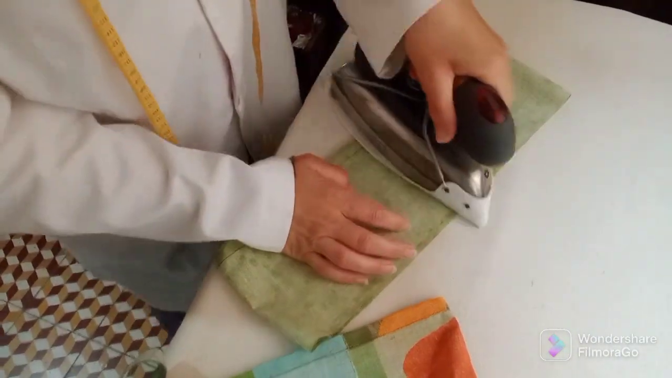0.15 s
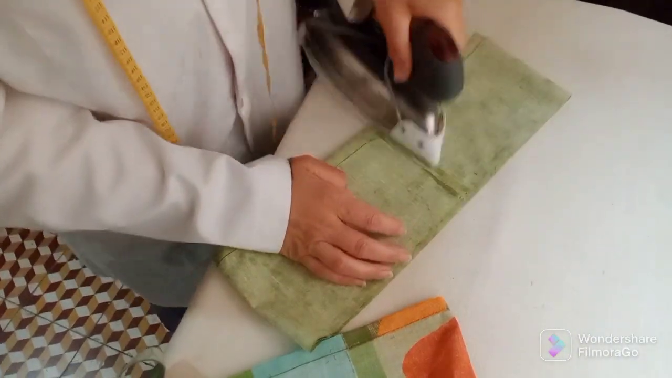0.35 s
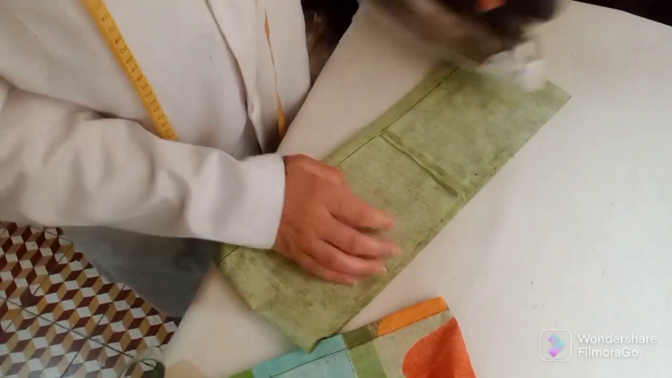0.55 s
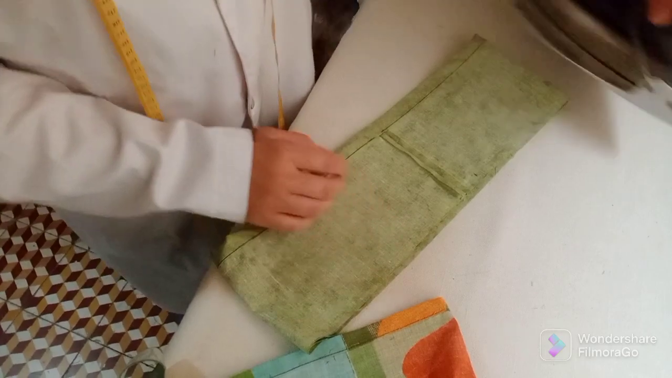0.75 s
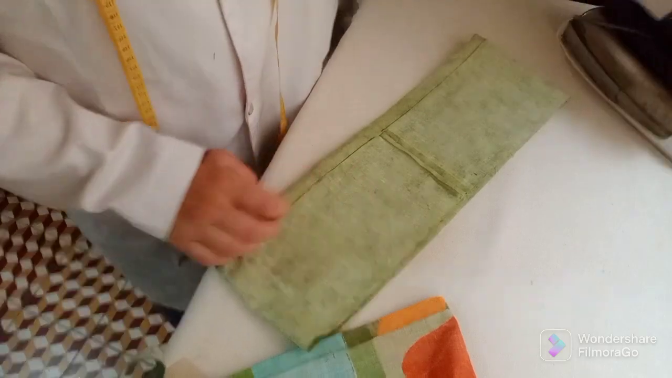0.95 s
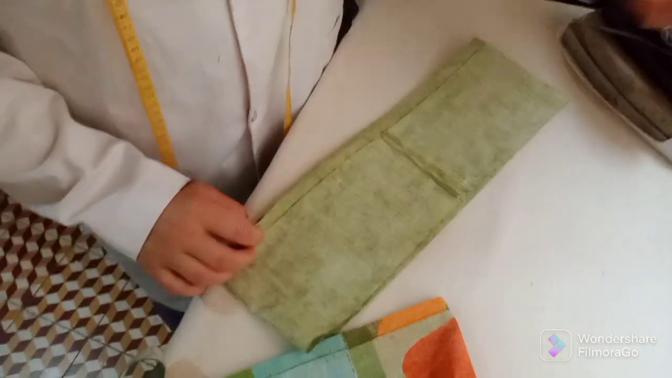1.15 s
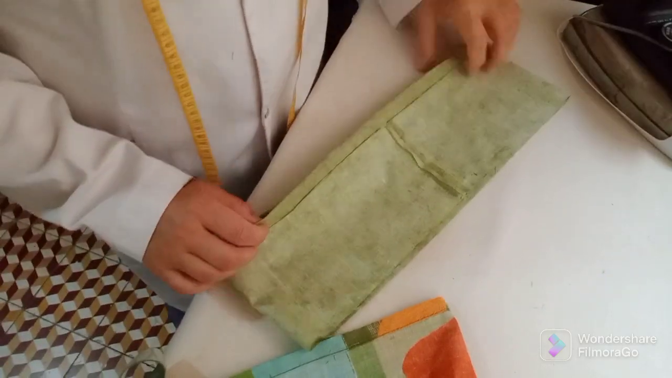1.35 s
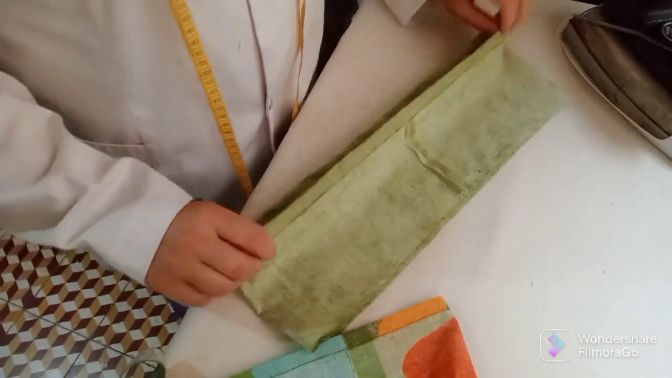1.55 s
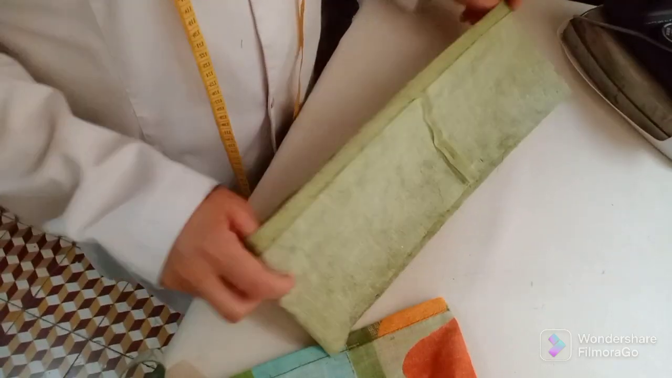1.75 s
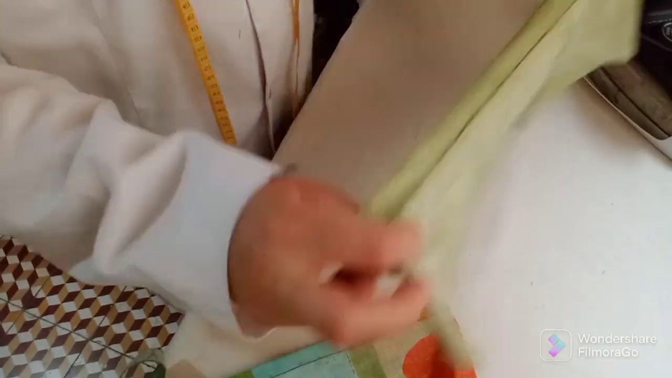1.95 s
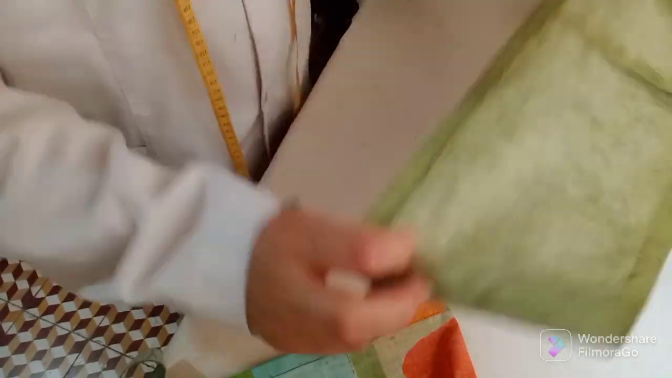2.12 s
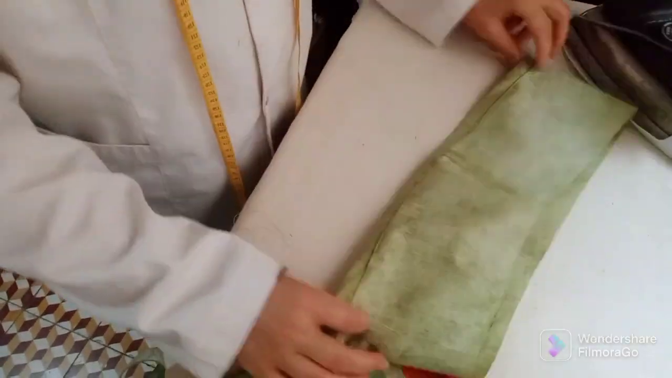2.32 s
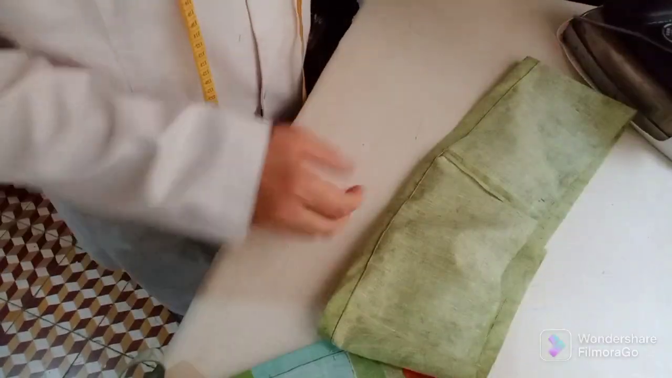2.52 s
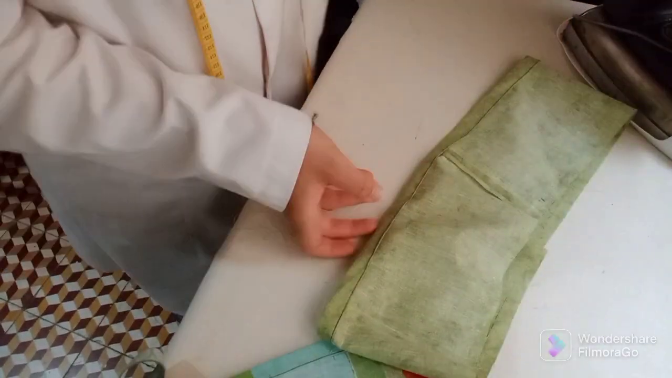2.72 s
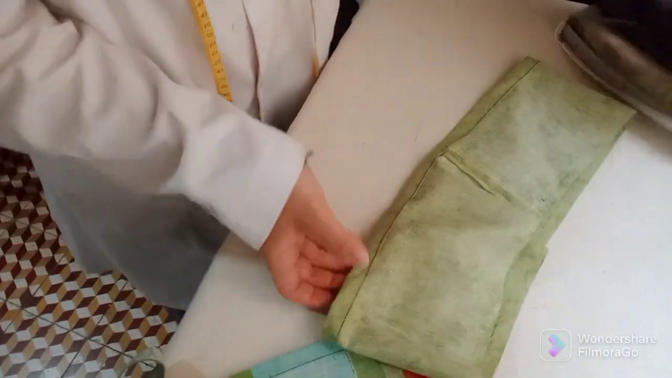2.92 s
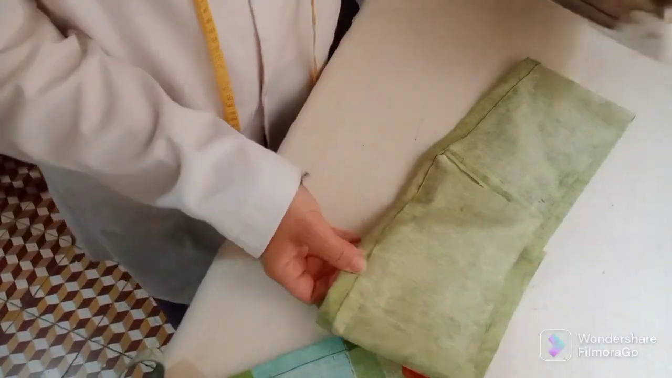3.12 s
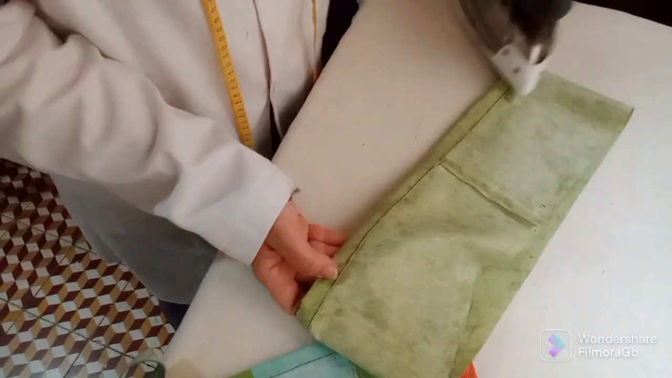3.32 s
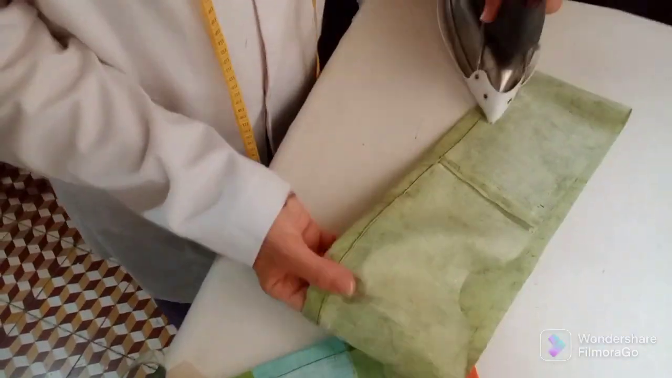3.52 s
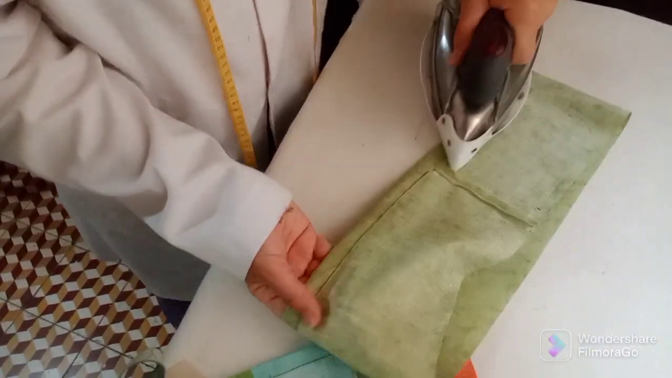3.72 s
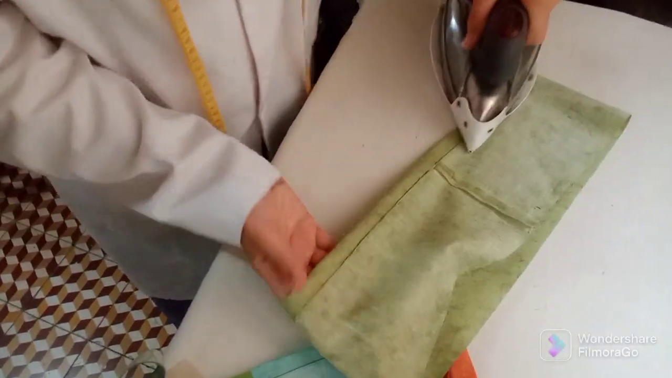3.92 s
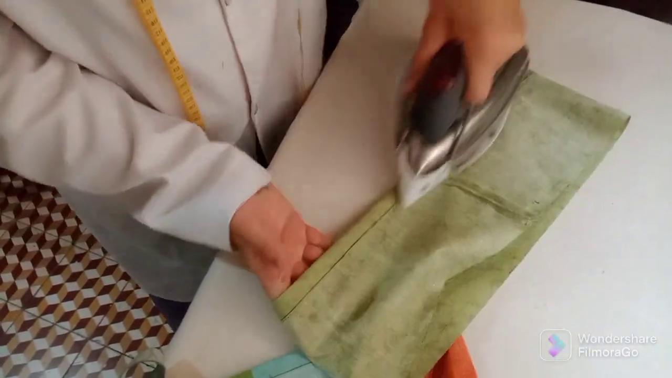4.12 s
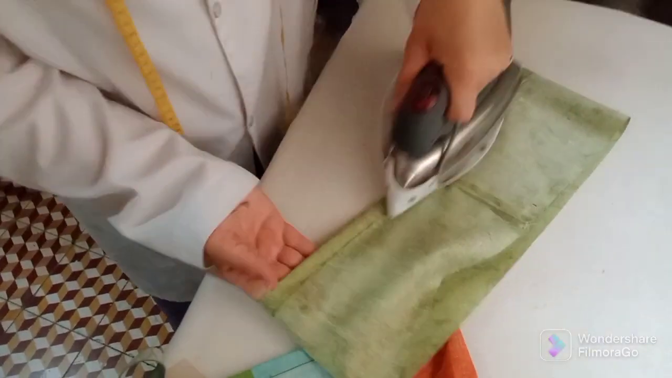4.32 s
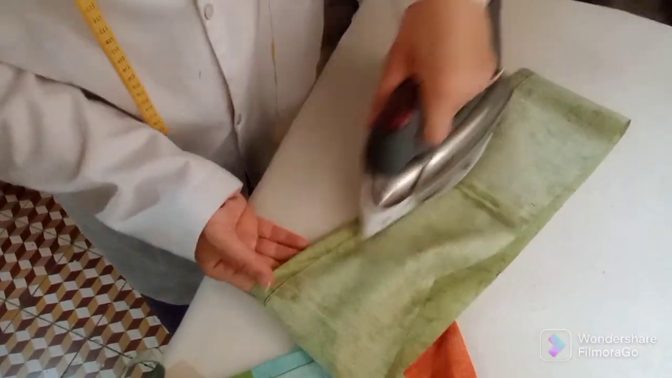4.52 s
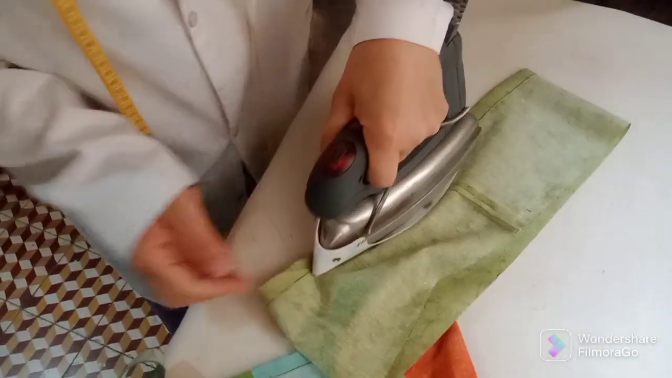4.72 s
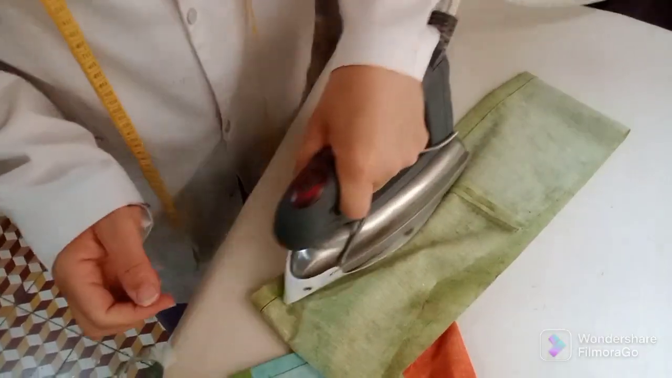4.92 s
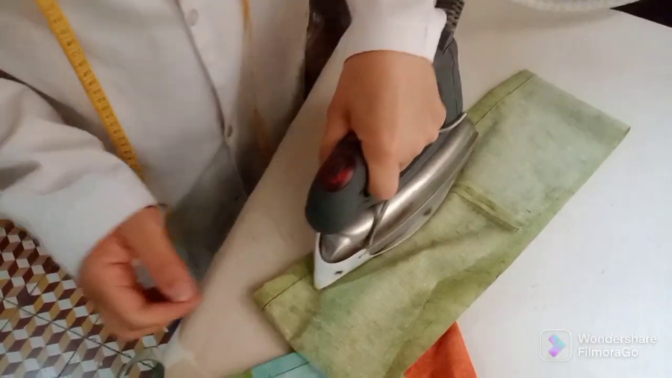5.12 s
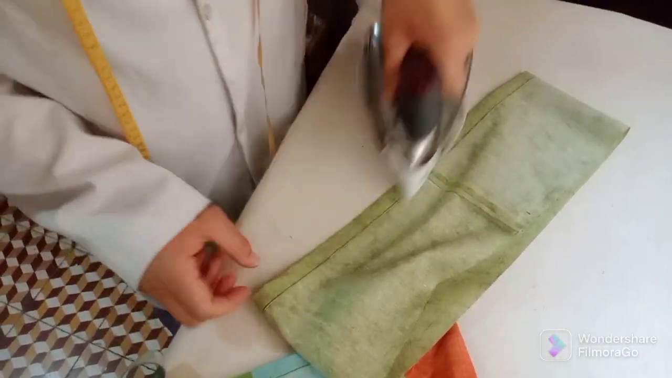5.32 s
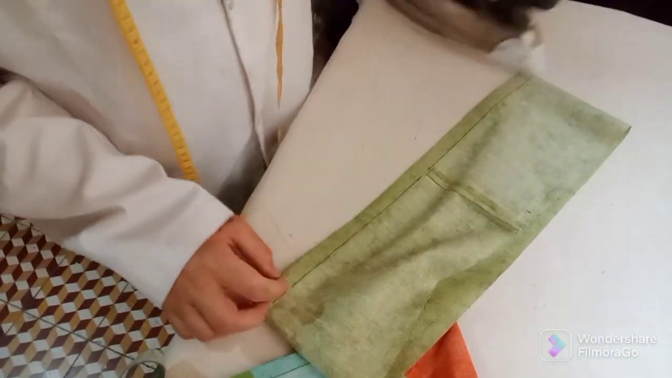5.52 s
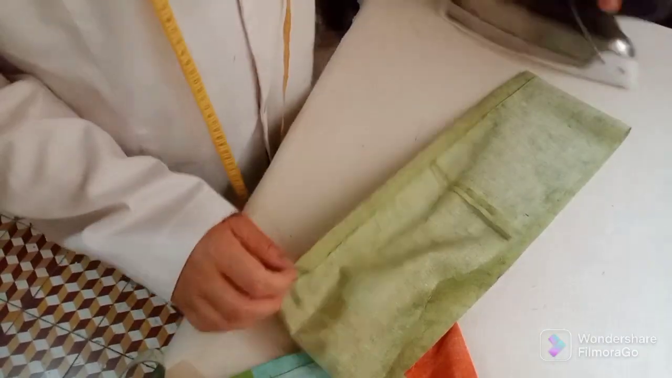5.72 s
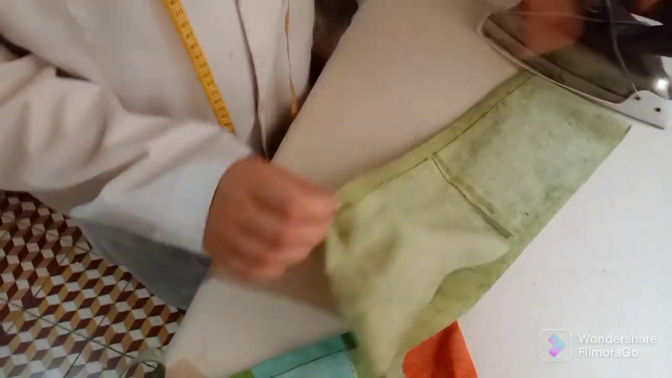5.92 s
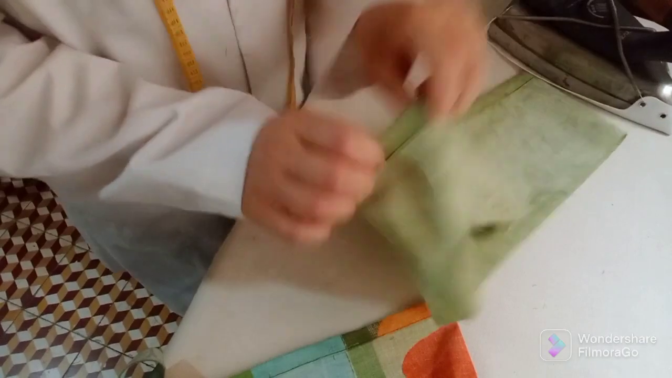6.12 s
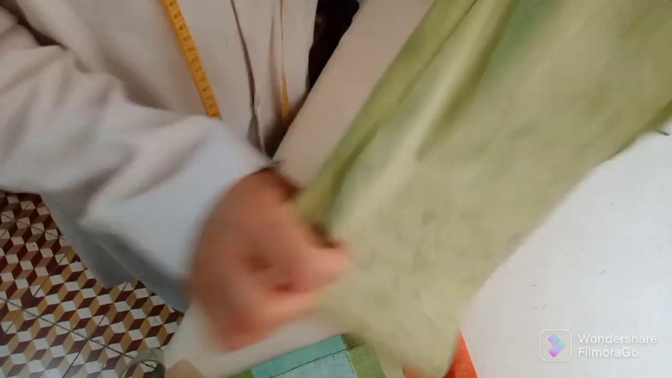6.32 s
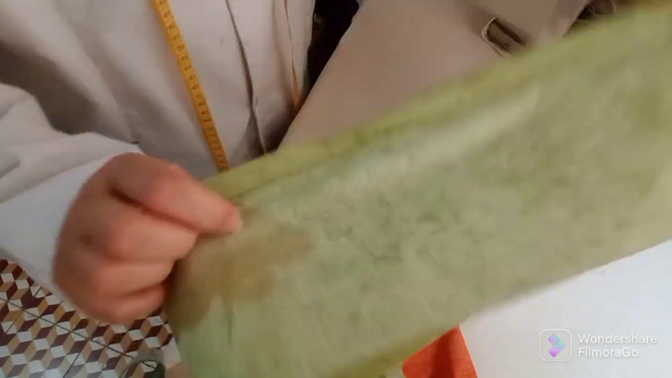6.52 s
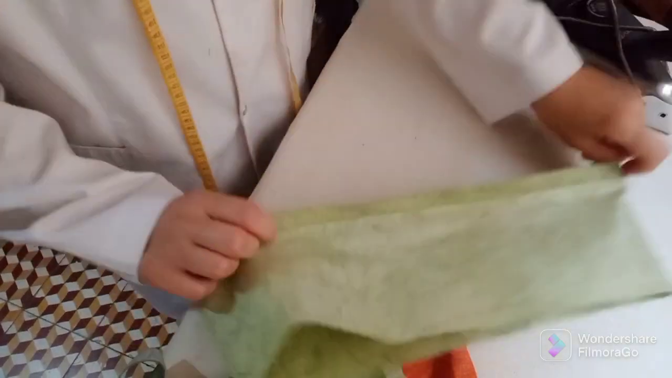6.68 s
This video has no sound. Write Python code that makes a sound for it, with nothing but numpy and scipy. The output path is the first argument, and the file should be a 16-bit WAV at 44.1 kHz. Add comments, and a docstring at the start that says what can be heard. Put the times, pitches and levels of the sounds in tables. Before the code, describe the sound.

An iron gives two long, sputtering blasts of hissing steam, knocking on a padded table, with soft cloth rustling in between.

```python
"""A sputtering blast of steam, then a second one: an iron presses seams on a padded table in a small room.
The jet rumbles into the padding, roars through the cloth, hisses from open vents and whistles under the
sole. Knocks and pushes ring the table's modes; the valve clicks ahead of the second blast. After each
blast the iron is set down and the cloth rustles as it is turned. Two close microphone ports colour it."""
import sys
import numpy as np
from scipy import signal
from scipy.fft import rfft, irfft, next_fast_len
from scipy.io import wavfile
from scipy.ndimage import map_coordinates

SR = 44100
rng = np.random.default_rng(int(sys.argv[2]) if len(sys.argv) > 2 else 0)


def transcribe(signal):
    """Save signal, clipped to [-1, 1], as a 16-bit WAV file at the path in sys.argv[1]."""
    frames = np.atleast_2d(signal).T
    limited = np.clip(frames, -1, 1)
    pcm = np.round(limited * 32767).astype(np.int16)
    wavfile.write(sys.argv[1], SR, pcm)


N = 297675

# Noise spectra, shape only (frequency [Hz], density [dB])
AMBIENCE_SPECTRUM = [(15, -45), (25, -13), (43, -16), (130, -1.5), (285, -8), (354, -10.5), (531, -14.5),
                     (887, -20.5), (1940, -25), (4490, -29), (7710, -25.5), (14800, -32), (16000, -29)]
SWISH_SPECTRUM = [(120, -16), (200, -6.5), (450, -6), (700, -5), (1200, -9.5), (1600, -8.5), (2500, -15),
                  (4000, -15.5), (7000, -21), (9000, -45)]
RUSTLE_SPECTRUM = [(2060, -42), (3500, -6), (5200, -4), (6440, -4.5), (7460, -2.5), (13800, -3.5),
                   (16000, -0.5)]
RUMBLE_SPECTRUM = [(100, -35), (170, -6.5), (232, -10.5), (353, -0.5), (384, -3.5), (477, -3), (792, -4.5),
                   (1600, -12.5), (2080, -32), (3520, -120)]
ROAR_SPECTRUM = [(350, -32.5), (600, -10.5), (676, -11), (926, -5), (1490, -4.5), (2200, -2.5), (2430, -4),
                 (3290, -3.5), (4700, -6), (8000, -18), (10400, -44.5), (17600, -120)]
HISS_SPECTRUM = [(2060, -37), (3500, -9), (5600, -1.5), (6310, -4), (7980, -1), (9040, -2.5), (11000, -6.5),
                 (14300, -36), (22000, -120)]
TOP_TREBLE_SPECTRUM = [(7000, -35), (10500, -2.5), (12000, -5.5), (16000, -5.5), (18000, -6.5)]
# Noise common to both ports (frequency [Hz], power share [0..1])
COHERENCE = [(60, 0.91), (130, 0.65), (300, 0.85), (640, 0.61), (1400, 0.17), (3100, 0.32), (6800, 0.2),
             (15000, 0.15)]
# Colour, one list per port (centre [Hz], width [Hz], gain [dB])
PORT_BANDS = [
    [(489, 190, 4), (2045, 750, 4), (3260, 300, 3), (6850, 550, 0), (8700, 700, 4), (10510, 1000, -2.5)],
    [(129, 87, 1), (1905, 250, 6.5), (4800, 900, 0.5), (6700, 1000, -0.5), (7650, 860, 4.5),
     (11200, 2400, 4.5)],
]
# Reflections off table top, sleeve and hand (delay [ms], wander [ms], gain re direct [ratio])
NEAR_ECHOES = [(.75, 0.06, 0.18), (1.899, 0.096, 0.078)]

# Cloth slid, lifted, turned (time [s], swish [dB], rustle [dB], rise [s], fall [s])
CLOTH_MOVES = [(1.456, -68, -66.5, .07, -0.2), (1.63, -65, -58.5, 0.16, 0.34), (1.79, -77, -66.5, .1, -0.8),
               (1.968, -68, -67.5, .12, 0.5), (2.274, -82, -66, 0.26, -0.2), (2.406, -60, -58.5, 0.093, .1),
               (2.69, -61.5, -68, .02, 0.7), (2.755, -66, -55, 0.13, 0.4), (2.815, -52.5, -64, 0.026, 0.17),
               (2.99, -46.5, -52.5, 0.052, 0.14), (3.17, -72, -67, .2, .2), (3.32, -62, -68, 0.15, -0.8),
               (6.1, -62, -78, 0.18, .3), (6.24, -44.5, -55, 0.11, 0.27), (6.3, -43, -46.5, 0.18, 0.05),
               (6.404, -48.5, -49.5, .2, 0.13), (6.55, -64, -65, .2, 0.2)]
# Weave dragging on itself (time [s], pitch [Hz], glide [Hz/s], level [dB], rise and fall [s])
WEAVE_DRAGS = [(1.465, 1150, 6000, -61, .04), (6.205, 2900, 0, -56, -0.02), (6.26, 3400, -2000, -51, 0),
               (6.29, 1500, 0, -45, -0.01), (6.315, 2400, 3000, -52, 0.06), (6.375, 3000, 9000, -53, 0.01),
               (6.4, 3800, 0, -63, 0.1), (6.425, 2300, -13000, -53, -0.02)]

# Leaning, pressing, setting down (time [s], boom of the top [dB], sway of the legs [dB])
PUSHES = [(.19, -49, -49), (.28, -49, -48.5), (.38, -53, -61), (1.05, -32, -35), (1.08, -21, -33),
          (1.17, -32, -42), (1.26, -37, -59.5), (1.65, -56.5, -68), (2.41, -41.5, -42), (2.48, -52.5, -53),
          (2.62, -56.5, -65.5), (2.74, -46, -53), (2.83, -56, -60), (3.01, -54, -75), (3.37, -49, -55),
          (3.44, -33.5, -40), (3.5, -40, -31.5), (3.57, -34.5, -48), (3.73, -46.5, -60), (3.88, -43.5, -57),
          (4.04, -59, -66), (4.28, -43, -57), (4.72, -44, -52), (4.92, -34.5, -70), (5.11, -40, -51.5),
          (5.24, -41, -57), (5.77, -51, -51), (5.95, -60, -56), (6.17, -52.5, -56), (6.3, -56, -55),
          (6.43, -56, -54), (6.62, -63.5, -68)]
# Lowest modes of top and legs (frequency [Hz], width [Hz], level [dB])
BOOM_MODES = [(121.3, 25, -9.5), (134.6, 10, -2.5), (170.3, 16, -9)]
SWAY_MODES = [(46.3, 32, -14), (61.6, 8.8, -6.5), (84.9, 32, 9)]
# Iron and hands on the table (time [s], level [dB], contact re body [dB], scuffle [s], tilt [dB/octave])
KNOCKS = [(0.094, -16, -11.5, 0.019, 1.5), (0.478, -18, -10, 0.044, 4), (1.029, -7, -15, 0.026, -6.5),
          (1.044, -14.5, -6, 0.015, 4), (1.061, -7.5, -5, 0.014, -2), (1.09, -20, -1.5, 0.03, -4),
          (1.159, -21, -14, 0.026, -5.5), (1.425, -39.5, -7, 0.02, -4.5), (2.317, -44.5, -12, 0.023, -1.5),
          (2.374, -28.5, -17, 0.0092, -3.5), (2.397, -33, -21, 0.02, -2.5), (2.689, -37.5, -9, 0.025, 1),
          (2.717, -44.5, -14.5, 0.022, -2), (2.975, -34, -7, 0.02, 0.5), (3.363, -30, -8, 0.048, -21),
          (3.425, -15.5, -20, 0.036, -1), (3.472, -19, -9.5, 0.033, -8), (3.518, -20, -11, 0.029, 1),
          (3.598, -23.5, -18, 0.03, 3), (4.011, -22, -33, 0.039, 6.5), (4.367, -17, -5, 0.0091, 6.5),
          (4.844, -14, -13, 0.012, 6.5), (4.877, -13.5, -21, 0.018, 3), (4.9, -10.5, -4, 0.0086, 1),
          (4.949, -24.5, -7, 0.023, -9), (5.237, -13.5, -16.5, 0.02, 17), (5.843, -25.5, -10, 0.02, 2)]
# Struck modes (frequency [Hz], level [dB], t60 [s])
TABLE_MODES = [(222, -6.5, 0.082), (267.5, -10, 0.28), (292.6, -9.5, 0.14), (326.4, -6, 0.13),
               (368.3, -6, 0.082), (407.6, -6, 0.099), (424.4, -11.5, 0.17), (476.6, -6, 0.14),
               (544, -6, 0.031), (600, -11, 0.04), (721, -4.5, 0.04), (853, -10, 0.085), (897, -9.5, .04),
               (1020, -5.5, 0.012), (1328, -6, 0.024), (1500, -15.5, 0.016)]
VALVE_MODES = [(5700, 4, .013), (7600, -2, .006), (8600, -9, .006), (9900, -8, .006), (14240, -14, .006)]
# Valve clicks; ticks of seams and nails, and the bare release click at 5.86 s as the second blast ends (time
# [s], level [dB], left minus right [dB])
VALVE_CLICKS = [(3.345, -33, -8), (3.3551, -17, -8.5)]
BRIGHT_TICKS = [(1.7908, -48, -2.0), (1.9734, -48, -2.0), (2.4026, -41.5, -5), (2.8092, -32, -6),
                (2.9437, -50, 14), (3.1687, -47, -5), (3.2553, -52, -10), (5.8568, -25, -7),
                (5.8694, -41, -11), (6.1404, -48, -13), (6.1973, -45, -4)]

# Sole nearing or leaving a surface, one list per whistle (time [s], pitch [Hz], level [dB])
WHISTLES = [
    [(.66, 4280, -48), (.72, 4530, -45), (.8, 5190, -37.5), (.88, 5670, -34), (.95, 5770, -42),
     (1.0, 5670, -51)],
    [(3.38, 5560, -50), (3.45, 5470, -46), (3.52, 5490, -44), (3.6, 5240, -55)],
    [(5.68, 5470, -40), (5.74, 5500, -45), (5.85, 5550, -67), (5.98, 5830, -69)],
]
# Resonances of the gap under the sole (multiple of pitch [ratio], level [dB])
GAP_MODES = [(1, 4.5), (1.492, -15)]
# Steam channels in the sole (frequency [Hz], width [Hz], level re roar at its usual strength [dB])
CHANNEL_MODES = [(460, 120, -17), (1750, 200, -18), (1960, 260, -15), (2230, 260, -14), (2580, 200, -18),
                 (3340, 280, -17), (3620, 200, -19), (4700, 300, -19)]
# Sole grinding into the padding (time [s], rumble [dB], rise [s], fall [s])
PRESSES = [(.43, -40, 0.058, 0.16), (1.073, -26.5, 0.092, 0.2028), (3.49, -35, 0.023, -1.87),
           (4.908, -18, 0.043, 0.14), (5.24, -31.5, 0.02, 0.22), (5.47, -32, 0.13, 0.2741)]
# Iron position (time [s], left port lag [ms])
IRON_PATH = [(0, 0.055), (.45, -0.053), (.9, .18), (1.3, 0.15), (3.35, 0.11), (3.7, 0.015), (4.4, -0.031),
             (5.1, -0.14), (5.45, -0.051), (5.7, 0.1), (6.05, 0.2)]
# Steam, one list per blast (time [s], roar through cloth [dB], vent hiss [dB], top treble [dB])
BLASTS = [
    [(0.0, -29.5, -39, -39), (0.082, -31, -40, -37), (0.146, -25, -35, -34), (0.212, -34, -43, -39.5),
     (0.382, -30, -38.5, -31.5), (0.434, -31.5, -43.5, -34.5), (0.478, -24.5, -37.5, -33.5),
     (0.564, -21, -20, -22.5), (0.64, -20, -19.5, -19), (0.692, -26, -23, -20), (0.798, -28.5, -22.5, -28),
     (1.008, -34.5, -42.5, -47.5), (1.074, -33.5, -47, -51), (1.154, -43, -63, -59), (1.42, -72, -75, -86)],
    [(3.359, -35, -15, -17), (3.372, -36, -43, -37), (3.43, -29, -36, -37), (3.5, -31, -33, -37),
     (3.62, -34, -39, -40.5), (3.76, -36, -42.5, -38.5), (3.83, -30, -37, -35.5), (4.06, -33.5, -41, -35.5),
     (4.19, -25.5, -31.5, -33), (4.39, -26, -35, -31.5), (4.6, -30, -32, -32), (4.68, -33, -33, -31.5),
     (4.75, -28.5, -39, -34.5), (4.9, -31, -33.5, -31), (4.98, -28.5, -39, -34.5),
     (5.31, -30.5, -35.5, -28.5), (5.39, -29, -38.5, -34.5), (5.47, -22, -26.5, -33.5),
     (5.51, -25.5, -29, -32.5), (5.59, -23, -21, -22.5), (5.67, -26.5, -25, -30),
     (5.84, -41.5, -50.5, -53.5), (5.86, -37.5, -42, -44), (5.9, -45.5, -55.5, -62.5),
     (6.1, -61.5, -66, -78)],
]

AMBIENCE_DB, USUAL_ROAR_DB, RUMBLE_DB = -62, -30, -36.5
ROOM_T60_S, WALL_CUT_HZ, ROOM_DB, CUTOFF_HZ = 0.57, 3600, -21.5, 15840
PUSH_RISE_S, BOOM_FALL_S, SWAY_LEAD_S, SWAY_FALL_S = 0.047, .17, .025, 0.098
BOOM_TREMOR_DB, SWAY_TREMOR_DB, TREMOR_SWING_DB = -55.5, -62, 2.5
RUMBLE_EXPONENT, CHANNEL_EXPONENT, TREMOR_EXPONENT = 0.8, .3, .5   # on roar / usual roar
CHANNEL_WAVER_DB, PAN_DB, PAN_DB_PER_MS = 1.6, -0.73, -6
RUSTLE_STRETCH = 1.16   # rise and fall re swish


def from_db(db):
    """Decibels to gain."""
    return 10 ** (np.asarray(db) / 20)


def pan(db):
    """Stereo gains for a left-minus-right level."""
    return from_db(np.array([[.5], [-.5]]) * db)


def in_time(rows):
    """Table columns, interpolated per sample."""
    times_s, *columns = np.transpose(rows)
    return [np.interp(np.arange(N) / SR, times_s, column) for column in columns]


def at_hz(points, hz):
    """Spectrum interpolated in log frequency."""
    points_hz, values = np.transpose(points)
    return np.interp(np.log(hz), np.log(points_hz), values)


def gains(spans, fade_s=0.0092, hold_s=0.048):
    """Level columns as gains; silent between spans."""
    t, out = np.arange(N) / SR, 0
    for rows in spans:
        start_s, end_s = rows[0][0], rows[-1][0]
        inside_s = np.minimum(t - start_s + (start_s == 0), end_s - t + hold_s)   # no fade-in at 0 s
        out = out + np.clip(inside_s / fade_s, 0, 1) * from_db(in_time(rows))
    return out


def swells(peak_s, db, rise_s, fall_s, rounding=0.064):
    """Gain of round-topped swells; rise, fall per 20 dB. Negative fall: the shorter time is the rise."""
    peak_s, db, rise_s, fall_s = [np.reshape(x, (-1, 1)) for x in (peak_s, db, rise_s, fall_s)]
    late_s = np.arange(0, N + 40, 40) / SR - peak_s
    drop = np.maximum(-late_s / rise_s, late_s / fall_s)
    drop_db = 20 * (np.hypot(drop, rounding) - rounding)
    power = from_db(2 * (db - drop_db)).sum(axis=0)
    return np.interp(np.arange(N) / 40, np.arange(len(power)), np.sqrt(power))


def drift(rate_hz):
    """Slow random wander, unit deviation."""
    pole = np.exp(-2 * np.pi * rate_hz * 40 / SR)
    slow = signal.lfilter([1], [1, -2 * pole, pole * pole], rng.standard_normal(N // 40 + 2002))[2000:]
    return np.interp(np.arange(N) / 40, np.arange(len(slow)), slow / slow.std())


def ring(force, hz, t60_s):
    """One damped mode driven by a force."""
    r, w = from_db(-60 / (t60_s * SR)), 2 * np.pi * hz / SR
    return signal.lfilter([0, np.sin(w)], [1, -2 * r * np.cos(w), r * r], force + 1e-18)


def delayed(x, ms):
    """Moving fractional delay."""
    return map_coordinates(x, [np.arange(N) - ms * SR / 1000], order=3, mode="nearest")


def narrow_noise(cycles, width_hz, steadiness=0.):
    """Noise band around a running phase; steadiness 1 leaves only pitch wander."""
    lowpass = signal.butter(2, width_hz / 2, fs=SR, output="sos")
    real, imag = signal.sosfilt(lowpass, rng.standard_normal((2, N + SR)))[:, SR:]
    wobble = real + 1j * imag
    band = np.real(wobble / abs(wobble) ** steadiness * np.exp(2j * np.pi * cycles))
    return band / band.std()


def band_noise(layers, band_flutter_db, flutter_db):
    """Third-octave noise from (spectrum, gain) layers; rows: shared, left only, right only."""
    edges_hz = 28 * 2 ** (np.arange(29) / 3)
    centres_hz = np.sqrt(edges_hz[1:] * edges_hz[:-1])
    powers = [from_db(2 * at_hz(spectrum, centres_hz)) * np.diff(edges_hz) for spectrum, _ in layers]
    common_db = flutter_db * drift(14)
    out, white = np.zeros((3, N)), rng.standard_normal((2, 3, N))
    for k, hz in enumerate(centres_hz):
        bandpass = signal.butter(2, edges_hz[k:k + 2], "band", fs=SR, output="sos")
        band = signal.sosfilt(bandpass, white[k % 2])
        level = np.sqrt(sum(p[k] / p.sum() * gain ** 2 for p, (_, gain) in zip(powers, layers)))
        alike = at_hz(COHERENCE, hz)
        shares = np.sqrt([[alike], [1 - alike], [1 - alike]])
        out += band / band.std() * shares * level * from_db(common_db + band_flutter_db * drift(7.2))
    return out


def room(x):
    """Wall echoes: eight feedback delays a side, duller each round."""
    size = next_fast_len(N + SR)
    delay_phase = -2j * np.pi * np.arange(size // 2 + 1) / size
    pole = np.exp(-2 * np.pi * WALL_CUT_HZ / SR)
    wall = (1 - pole) / (1 - pole * np.exp(delay_phase))
    response = np.zeros((2, len(wall)), complex)
    for k, lag in enumerate((rng.uniform(.015, .045, 16) * SR).astype(int)):
        loop = from_db(-60 * lag / SR / ROOM_T60_S) * wall * np.exp(delay_phase * lag)
        response[k % 2] += loop / (1 - loop) * (-1) ** (k // 2)
    return irfft(response * rfft(x, size), size)[:, :N]


def with_near_echoes(x):
    """Short wandering paths comb faint shifting bands into the hiss."""
    echoes = sum(gain * delayed(x, ms + wander_ms * drift(0.69)) for ms, wander_ms, gain in NEAR_ECHOES)
    return (x + echoes) / np.sqrt(1 + sum(gain ** 2 for _, _, gain in NEAR_ECHOES))


def crumple(swish, snaps_per_s=500):
    """Folds give way in tiny uneven snaps, each ringing a few cycles."""
    sizes = from_db(4.4 * np.minimum(rng.exponential(1, N), 4)) * rng.choice([-1, 1], N)
    force = sizes * (rng.random(N) < snaps_per_s / SR)
    modes_hz, mode_index = np.geomspace(1100, 3600, 12), rng.integers(0, 12, N)
    snaps = sum(ring(force * (mode_index == k), hz, 10 / hz) for k, hz in enumerate(modes_hz))
    return swish * from_db(-12) * snaps / snaps.std()


def weave():
    """Weave drags over itself: brief breathy notes, pitch following speed."""
    t, out = np.arange(N) / SR, 0
    for peak_s, hz, glide_hz_per_s, db, edge_s in WEAVE_DRAGS:
        pitch_hz = hz + glide_hz_per_s * np.clip(t - peak_s, -.1, .1)
        note = narrow_noise(np.cumsum(pitch_hz) / SR, width_hz=330)
        if edge_s:
            out = out + swells(peak_s, db, edge_s, edge_s) * note
    return out


def cloth_and_ambience():
    """Fibres slide over the padding above a faint steady background."""
    peak_s, swish_db, rustle_db, rise_s, fall_s = np.transpose(CLOTH_MOVES)
    swish = swells(peak_s, swish_db, rise_s, fall_s)
    rustle = swells(peak_s, rustle_db, RUSTLE_STRETCH * rise_s, RUSTLE_STRETCH * fall_s)
    layers = [(SWISH_SPECTRUM, swish), (RUSTLE_SPECTRUM, rustle),
              (AMBIENCE_SPECTRUM, from_db(AMBIENCE_DB))]
    shared, *sides = band_noise(layers, band_flutter_db=.9, flutter_db=.8)
    return shared + np.array(sides) + crumple(swish) + weave()


def table_shake():
    """Pushes and the gliding iron keep top and legs humming; the tremor follows the roar."""
    t, out = np.arange(N) / SR, 0
    peak_s, boom_db, sway_db = np.transpose(PUSHES)
    glide = (gains(BLASTS)[0] / from_db(USUAL_ROAR_DB)) ** TREMOR_EXPONENT
    boom_tremor = glide * from_db(BOOM_TREMOR_DB + TREMOR_SWING_DB * drift(6.1))
    sway_tremor = glide * from_db(SWAY_TREMOR_DB + TREMOR_SWING_DB * drift(8))
    boom = np.hypot(swells(peak_s, boom_db, PUSH_RISE_S, BOOM_FALL_S), boom_tremor)
    sway = np.hypot(swells(peak_s - SWAY_LEAD_S, sway_db, PUSH_RISE_S, SWAY_FALL_S), sway_tremor)
    for modes, gain, side_db in ((BOOM_MODES, boom, -22), (SWAY_MODES, sway, -15)):
        mid, side = [sum(from_db(db) * narrow_noise(hz * t, width_hz, steadiness=0.93)
                         for hz, width_hz, db in modes) for _ in range(2)]
        out = out + gain * (mid + from_db(side_db) * side * [[1], [-1]]) / mid.std()
    return out


def table_knocks():
    """Crisp contact plus a padded, dying scuffle; a random landing spot weights the modes."""
    out, t = np.zeros(N + SR), np.arange(round(.4 * SR)) / SR
    padding = signal.butter(2, 1500, fs=SR, output="sos")
    contact_band = signal.butter(1, [500, 2200], "band", fs=SR, output="sos")
    for start_s, db, contact_db, scuffle_s, tilt_db_per_oct in KNOCKS:
        scuffle = 0.06 * rng.standard_normal(len(t)) * np.exp(-t / scuffle_s)
        scuffle[0] += .8   # impact
        force = signal.sosfilt(padding, scuffle)
        body = 0
        for k, (hz, mode_db, t60_s) in enumerate(TABLE_MODES):
            spot_db = 2 * rng.standard_normal()
            gain = from_db(mode_db + spot_db + tilt_db_per_oct * np.log2(hz / 400))
            body = body + (-1) ** k * gain * ring(force, hz, t60_s)
        contact = signal.sosfilt(contact_band, rng.standard_normal(len(t)) * np.exp(-t / 0.0021))
        knock = body / abs(body).max() + from_db(contact_db) * contact / abs(contact).max()
        out[round(start_s * SR):][:len(t)] += from_db(db - 5) * knock
    return out[:N]


def bright_ticks():
    """Seams and nails, and the release click at 5.86 s: bare bright snaps."""
    out, t = np.zeros((2, N)), np.arange(round(0.024 * SR)) / SR
    bright = signal.butter(2, [2500, 11000], "band", fs=SR, output="sos")
    for start_s, db, pan_db in BRIGHT_TICKS:
        snap = signal.sosfilt(bright, rng.standard_normal((2, len(t))) * np.exp(-t / 0.0049))
        out[:, round(start_s * SR):][:, :len(t)] += from_db(db - 3.5) * snap * pan(pan_db)
    return out


def valve_clicks():
    """A snap rings the valve's small metal modes."""
    out, t = np.zeros((2, N)), np.arange(round(0.024 * SR)) / SR
    for start_s, db, pan_db in VALVE_CLICKS:
        snap = 0.13 * rng.standard_normal(len(t)) * (t / 0.0012) ** 2 * np.exp(-t / 0.001)
        metal = sum(from_db(mode_db) * ring(snap, hz, t60_s) for hz, mode_db, t60_s in VALVE_MODES)
        click = metal + 0.13 * np.diff(snap, prepend=0)
        out[:, round(start_s * SR):][:, :len(t)] += from_db(db) * click * pan(pan_db)
    return out


def gap_whistle():
    """The gap under the sole resonates on jet noise; narrower gap, higher pitch."""
    pitch_hz, _ = in_time(np.concatenate(WHISTLES))
    cycles = np.cumsum(pitch_hz) / SR
    blowing, = gains([[(time_s, db) for time_s, _, db in rows] for rows in WHISTLES])
    tones = [sum(from_db(db) * narrow_noise(ratio * cycles, width_hz=600) for ratio, db in GAP_MODES)
             for _ in range(2)]
    return np.array(tones) * blowing * pan(-5)


def steam():
    """One sputtering jet through padding, cloth, vents and sole channels, panned by iron position."""
    roar, hiss, top_treble = gains(BLASTS)
    surge = roar / from_db(USUAL_ROAR_DB)
    rumble = np.hypot(from_db(RUMBLE_DB) * surge ** RUMBLE_EXPONENT, swells(*np.transpose(PRESSES)))
    layers = [(ROAR_SPECTRUM, roar), (RUMBLE_SPECTRUM, rumble), (HISS_SPECTRUM, hiss),
              (TOP_TREBLE_SPECTRUM, top_treble)]
    shared, left, right = band_noise(layers, band_flutter_db=1.0, flutter_db=.4)
    for hz, width_hz, db in CHANNEL_MODES:
        gain = roar * surge ** CHANNEL_EXPONENT * from_db(db + CHANNEL_WAVER_DB * drift(5.4))
        pitch_hz = hz * (1 + .025 * drift(1.2))
        shared = shared + gain * narrow_noise(np.cumsum(pitch_hz) / SR, width_hz)
    lag_ms, = in_time(IRON_PATH)
    pair = np.array([with_near_echoes(x) for x in (delayed(shared, lag_ms) + left, shared + right)])
    return pair * pan(PAN_DB + PAN_DB_PER_MS * lag_ms)


def scene():
    """Iron, table, room echo, cloth and background."""
    iron = steam() + gap_whistle() + valve_clicks() + bright_ticks()
    knocks = table_knocks()
    echo = from_db(ROOM_DB) * room(iron.mean(axis=0) + from_db(3.5) * knocks)
    return iron + knocks * pan(.6) + table_shake() * pan(-.6) + echo + cloth_and_ambience()


def record(dry):
    """Each small port lifts and dips its own bands; deepest bass and top are cut."""
    out = []
    for x, bands in zip(dry, PORT_BANDS):
        for hz, width_hz, db in bands:
            width, gain = np.tan(np.pi * width_hz / SR), from_db(db / 2)
            centre = -2 * np.cos(2 * np.pi * hz / SR)
            x = signal.lfilter([1 + width * gain, centre, 1 - width * gain],
                               [1 + width / gain, centre, 1 - width / gain], x)
        out.append(x)
    out = signal.sosfilt(signal.butter(3, 48, "high", fs=SR, output="sos"), out)
    return signal.sosfilt(signal.ellip(12, .5, 60, CUTOFF_HZ, fs=SR, output="sos"), out)


dry = scene()
out = record(dry)
transcribe(out)
```